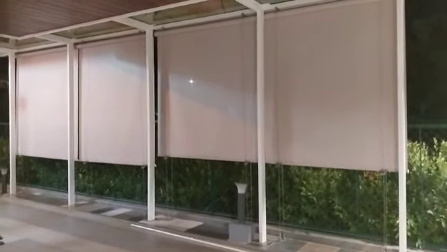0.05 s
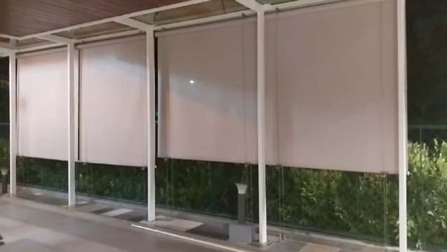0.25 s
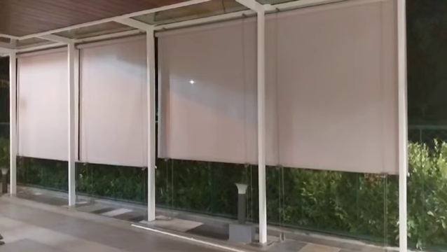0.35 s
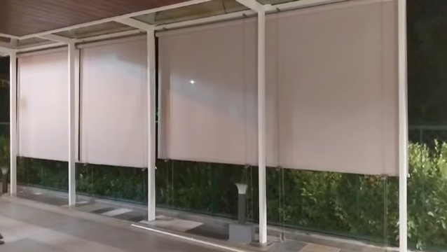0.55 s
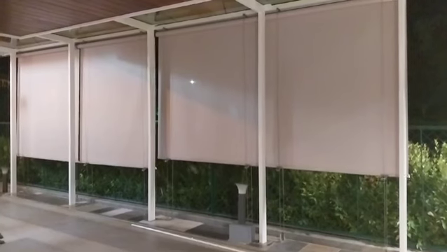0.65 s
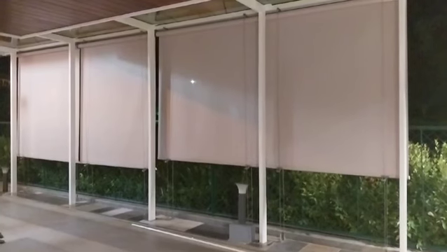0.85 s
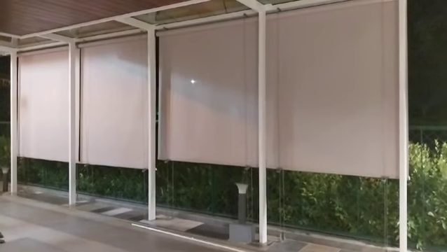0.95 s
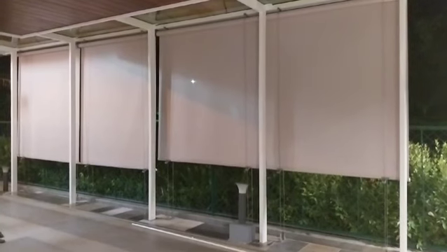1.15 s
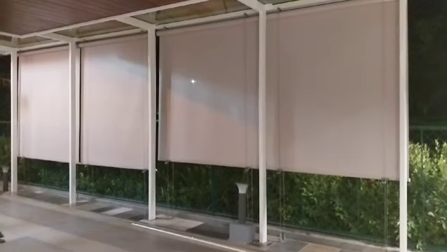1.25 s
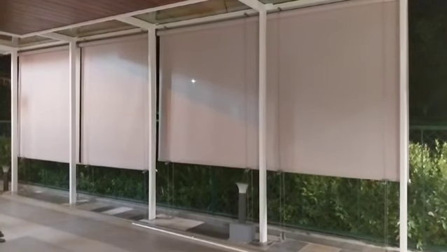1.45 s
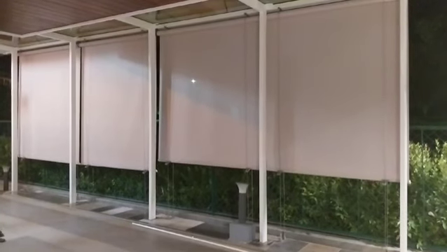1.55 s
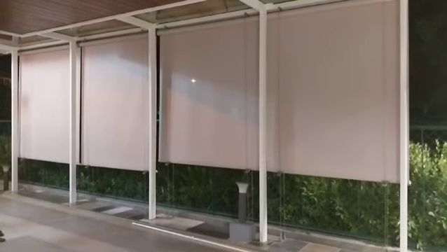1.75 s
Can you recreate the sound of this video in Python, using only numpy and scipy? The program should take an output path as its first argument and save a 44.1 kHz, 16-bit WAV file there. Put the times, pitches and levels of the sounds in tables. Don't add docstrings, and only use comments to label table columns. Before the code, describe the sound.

Continuous high cricket chirping from a hedge, with soft distant rumble and one low microphone bump

```python
import sys
import numpy as np
from scipy import signal
from scipy.fft import rfft, irfft, next_fast_len
from scipy.io import wavfile
from scipy.ndimage import map_coordinates

SR = 44100
rng = np.random.default_rng(int(sys.argv[2]) if len(sys.argv) > 2 else 0)


def to_wav(s):
    ch = np.atleast_2d(s).T
    pcm = np.round(np.clip(ch, -1, 1) * 32767)
    wavfile.write(sys.argv[1], SR, pcm.astype(np.int16))


def decibels_to_gain(level_db):
    exponent = np.asarray(level_db, float) / 20
    return 10 ** exponent


N = 79380
TIME_S = np.arange(N) / SR


def unit(x):
    return x / np.sqrt(np.mean(x ** 2, axis=-1, keepdims=True) + 1e-20)


def along(points, hz):
    f, v = np.transpose(points)
    return np.interp(np.log(hz + 1), np.log(f + 1), v)


def over_time(points):
    s, db = np.transpose(points)
    return np.interp(TIME_S, s, db)


def wobble(rate):
    knots = rng.standard_normal(int(N * rate / SR) + 4)
    return map_coordinates(knots, [np.arange(N) * rate / SR])


def filtered(x, response):
    m = next_fast_len(N + SR // 2)
    hz = np.fft.rfftfreq(m, 1 / SR)
    return irfft(rfft(x, m) * response(hz), m)[..., :N]


def shaped(x, curve):
    return filtered(x, lambda hz: decibels_to_gain(along(curve, hz)))


# (frequency [Hz], left-right correlation [0-1])
ALIKE = [(60, 0.34), (270, 0.88), (500, 0.72), (800, 0.42), (1300, 0.23), (5000, .03)]


def rush(spectrum):
    closed = [(spectrum[0][0] * .8, -120), *spectrum, (spectrum[-1][0] * 1.25, -120)]

    def mid_side(hz):
        turn = np.arccos(np.clip(along(ALIKE, hz), -1, 1)) / 2
        return decibels_to_gain(along(closed, hz)) * [np.cos(turn), np.sin(turn)]

    mid, side = filtered(rng.standard_normal((2, N)), mid_side)
    return unit(np.array([mid + side, mid - side]))


def hedge(x):
    t60_s = .095
    t = np.arange(SR // 4) / SR
    tail = rng.standard_normal((2, len(t))) * decibels_to_gain(-60 * t / t60_s)
    return unit(signal.fftconvolve(x[None], tail, axes=1)[:, :N])


def close(song, wet_db):
    wet = hedge(song)
    return unit(np.array([song, wet[1]]) + decibels_to_gain(wet_db) * wet)


TOP_HZ, FALL_HZ = 7360, 1902


def scrapes(rate, first_s, top_hz, fall_hz, rough):
    scrape_s, pair_gap_s, second_db = .012, .0215, -1
    song = 0
    for late_s, db in ((0, 0), (pair_gap_s, second_db)):
        stroke = np.minimum(((TIME_S - first_s - late_s) % (1 / rate)) / scrape_s, 1)
        turns = np.cumsum(top_hz - fall_hz * stroke) / SR
        swing = np.sin(2 * np.pi * turns + rough * wobble(600))
        song = song + decibels_to_gain(db + 2.07 * wobble(39.89)) * np.sin(np.pi * stroke) * swing
    return unit(song)


# (frequency [Hz], level [dB])
WINGS = [(4800, -33.5), (5400, -18), (6000, -4), (6600, -1.5), (7100, 0), (7450, -5.5), (7900, -16),
         (8300, -46)]


def near_cricket():
    song = scrapes(14.165, -.005965, TOP_HZ, FALL_HZ, rough=.85)
    return decibels_to_gain(-47) * unit(shaped(close(song, wet_db=-3), WINGS))


# (frequency [Hz], level [dB])
HIGH_WINGS = [(7200, -20), (7450, -3), (7570, 0), (7800, -6), (8000, -14), (8200, -32)]


def high_cricket():
    song = scrapes(15.68, -.020, 7880, 560, rough=.9)
    return decibels_to_gain(-57) * unit(shaped(close(song, wet_db=-3.5), HIGH_WINGS))


def held_note():
    rate, centre_s, long_s = 14.15, .016, .014
    off_s = ((TIME_S - centre_s) * rate + .5) % 1 / rate - .5 / rate
    swell = decibels_to_gain(-47 + 2.2 * wobble(15)) * np.exp(-(off_s / long_s) ** 2)
    return swell * np.sin(2 * np.pi * 7037 * TIME_S + .5 * wobble(30))


def chorus():
    rate_spread, pitch_spread, size_spread_db = .15, .05, 1
    crowd = 0
    for pace, pitch, size in rng.standard_normal((12, 3)):
        rate = 14.5 * (1 + rate_spread * pace)
        song = scrapes(rate, size, TOP_HZ * (1 + pitch_spread * pitch), FALL_HZ, rough=.98)
        crowd = crowd + decibels_to_gain(size_spread_db * size) * hedge(song)
    return decibels_to_gain(-46.5) * unit(shaped(crowd, WINGS)) + decibels_to_gain(-45.5) * rush(WINGS)


# (frequency [Hz], level [dB])
STEADY = [(6690, -63), (7205, -65), (6340, -68), (7545, -67)]


def trills():
    total = 0
    for hz, db in STEADY:
        level = decibels_to_gain(db + 4.3 * np.array([wobble(25), wobble(25)]))
        total = total + level * np.sin(2 * np.pi * hz * TIME_S + .28 * wobble(18))
    return total


def crickets():
    return near_cricket() + high_cricket() + held_note() + chorus() + trills()


# (frequency [Hz], level [dB])
WHINE = [(8200, -26), (8700, -1), (9300, 5.5), (9800, -7), (10300, -22)]
# (frequency [Hz], level [dB])
FIZZ = [(9800, -9), (10500, -7), (11200, -4), (12300, 0), (14000, -2), (15000, -6), (15800, -8)]


def high_insects():
    beat_db = -.9 * np.sin(2 * np.pi * 3.9 * TIME_S + 3.4)
    whine = decibels_to_gain(-71 + .83 * wobble(.5) + .67 * wobble(66)) * rush(WHINE)
    fizz = decibels_to_gain(-71.5 + beat_db + .8 * wobble(15)) * rush(FIZZ)
    return whine + fizz


# (frequency [Hz], level [dB])
TRAFFIC = [(20, -30), (50, -2), (100, -4.5), (250, -4.5), (520, -10), (890, -6), (960, -14), (1400, -24)]
# (frequency [Hz], level [dB])
ROAD = [(900, -24), (1400, -2), (1900, 2), (2500, -4), (3700, -8.5), (4600, -11.5), (8300, -11),
        (10400, -21)]
# (time [s], level [dB])
PASSING = [
    (0, -64),
    (.85, -63.5),
    (1.3, -61.5),
    (1.8, -60.5),
]


def traffic():
    tyres = decibels_to_gain(over_time(PASSING) + .88 * wobble(7.75)) * rush(ROAD)
    rumble = decibels_to_gain(-51 + .7 * wobble(12)) * rush(TRAFFIC)
    return rumble + tyres


# (frequency [Hz], level [dB])
COVER = [(60, 3), (600, 2.5), (1150, 0), (1500, -8), (2700, -16), (4900, -19), (6500, -27.5), (8100, -49)]
# (frequency [Hz], level [dB])
LEAK = [(8900, -30), (9050, -2), (10400, -2), (11800, 0), (13000, -2), (15800, -9)]


def covered_port(sound):
    return shaped(sound, COVER) + decibels_to_gain(-80) * rush(LEAK)[1]


# (frequency [Hz], level [dB])
RUB = [(30, -20), (60, -5), (100, 0), (160, -5), (260, -16)]
# (time [s], level [dB])
GRIP = [(0.32, -51), (0.55, -59), (0.586, -52), (0.682, -52.5), (0.806, -46.5), (1.122, -56), (1.172, -47),
        (1.246, -53.5), (1.596, -43.5), (1.638, -53.5), (1.728, -45.5), (1.8, -55)]


def finger_rub():
    mean_db = np.transpose(GRIP)[1].mean()
    grip_db = over_time(GRIP) - mean_db
    rub = decibels_to_gain(-51 + grip_db + 2 * wobble(11.88)) * rush(RUB)[0]
    return np.array([.45 * rub, rub])


# (time [s], level [dB])
CROAKS = [
    (.31, -56),
    (.68, -59.5),
    (1.09, -61.5),
    (1.46, -59),
]


def frog():
    croak_s, throat_hz, wide_hz = .095, 855, 65
    swell = sum(decibels_to_gain(db) * np.exp(-((TIME_S - s) / croak_s) ** 2) for s, db in CROAKS)
    breath = rng.standard_normal(N)
    return swell * unit(filtered(breath, lambda hz: 1 / (1 + ((hz - throat_hz) / wide_hz) ** 4)))


# (frequency [Hz], level [dB], decay [s], first swing [+1 or -1])
SHELL = [
    (49, -21, .008, 1),
    (209, -16.5, .0037, -1),
    (370, -35, .005, -1),
    (730, -34, .0014, 1),
]


def finger_press():
    press_hz, extra_turns, settle_s, rise_s, die_s = 97, .7, .001, .0048, .0165
    t = np.maximum(TIME_S - .2285, 0)
    turns = press_hz * t + extra_turns * (1 - np.exp(-t / settle_s))
    swell = (1 - np.exp(-(t / rise_s) ** 2)) * np.exp(-(t / die_s) ** 1.28)
    press = -decibels_to_gain(-3.6) * swell * np.sin(2 * np.pi * turns)
    knock = 0
    for hz, db, die, way in SHELL:
        knock = knock + way * decibels_to_gain(db) * t / die * np.exp(1 - t / die) * np.sin(2 * np.pi * hz * t)
    return np.array([np.zeros(N), press + knock])


# (time [s], level [dB])
TICKS = [
    (0.511, -64),
    (1.792, -53),
]


def twigs():
    burst = sum(decibels_to_gain(db) * (TIME_S > s) * np.exp(-np.abs(TIME_S - s) / .0015) for s, db in TICKS)
    return burst * unit(filtered(rng.standard_normal(N), lambda hz: hz > 9500))


def scene():
    left, right = crickets() + high_insects() + traffic() + frog() + twigs()
    return np.array([left, covered_port(right)]) + finger_rub() + finger_press()


def top_cut(x):
    return signal.sosfilt(signal.butter(12, 15630, fs=SR, output="sos"), x)


def record(dry):
    low_cut_hz = 26
    heard = filtered(dry, lambda hz: hz ** 4 / (hz ** 4 + low_cut_hz ** 4))
    return top_cut(heard)


dry = scene()
out = record(dry)
to_wav(out)
```